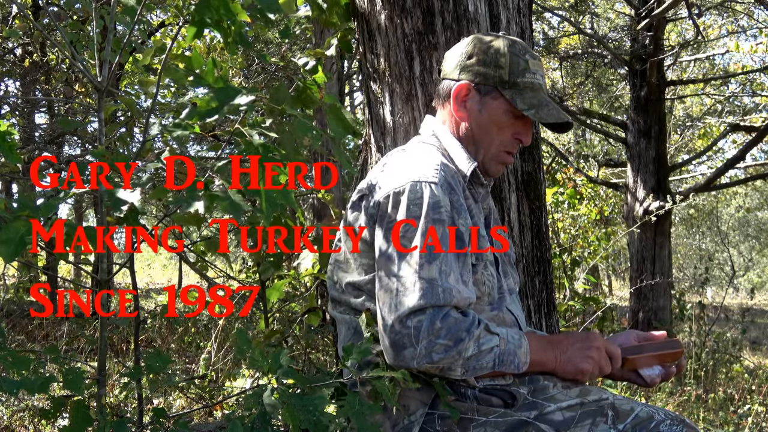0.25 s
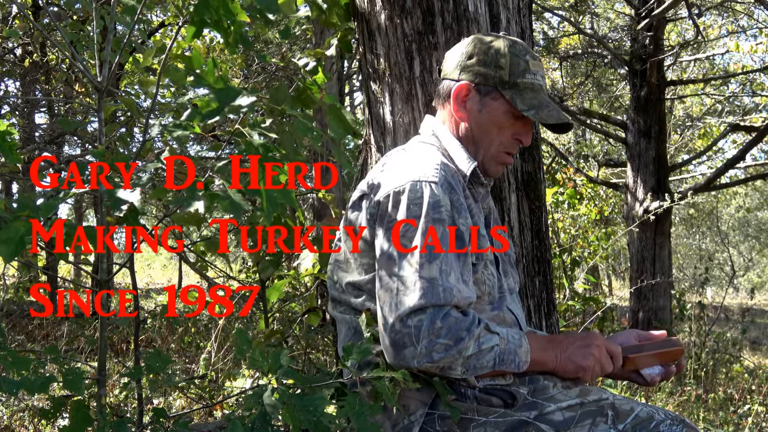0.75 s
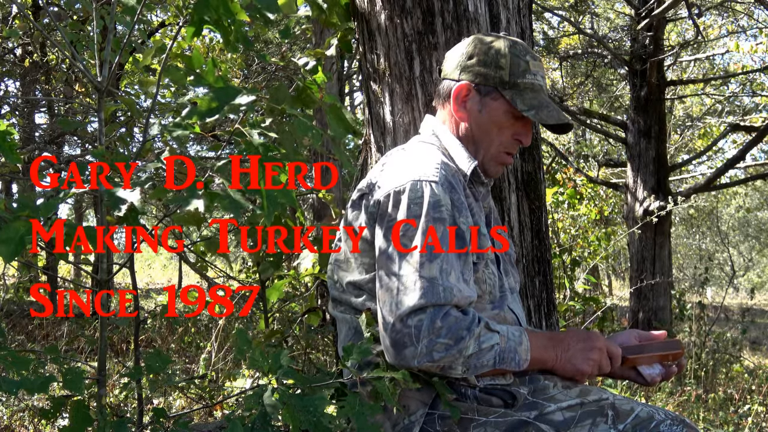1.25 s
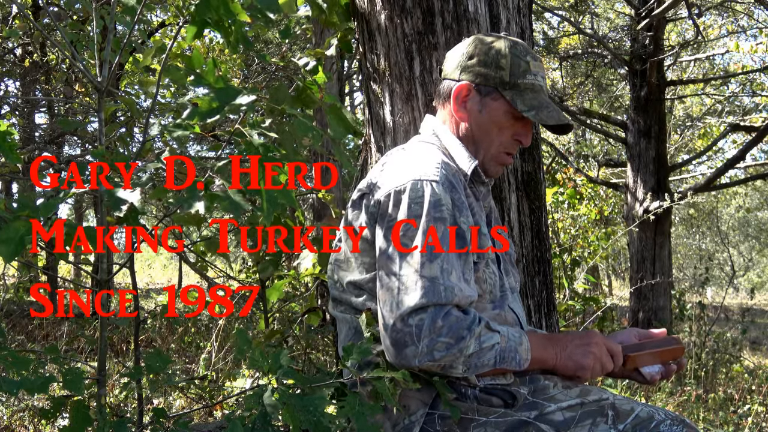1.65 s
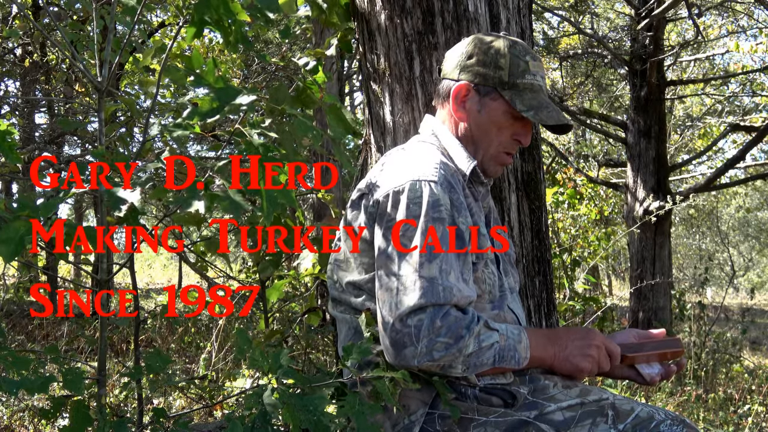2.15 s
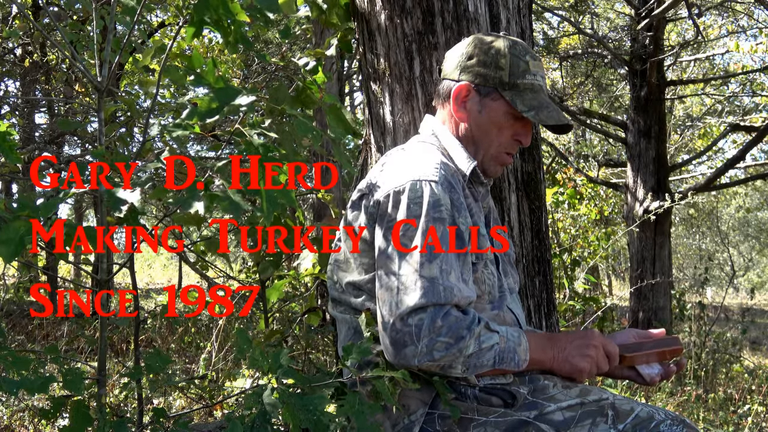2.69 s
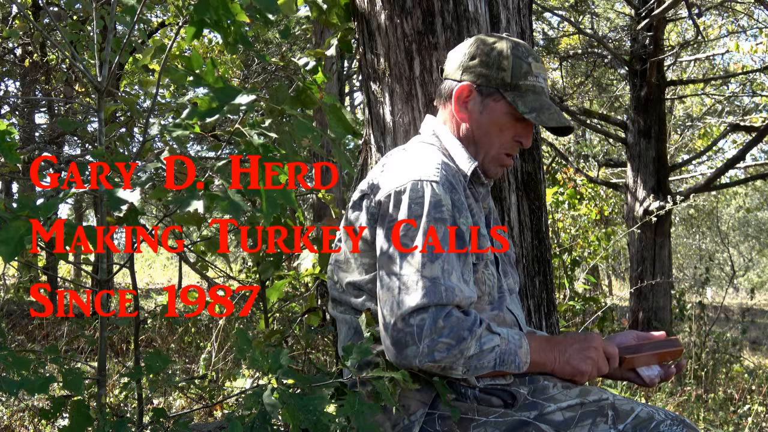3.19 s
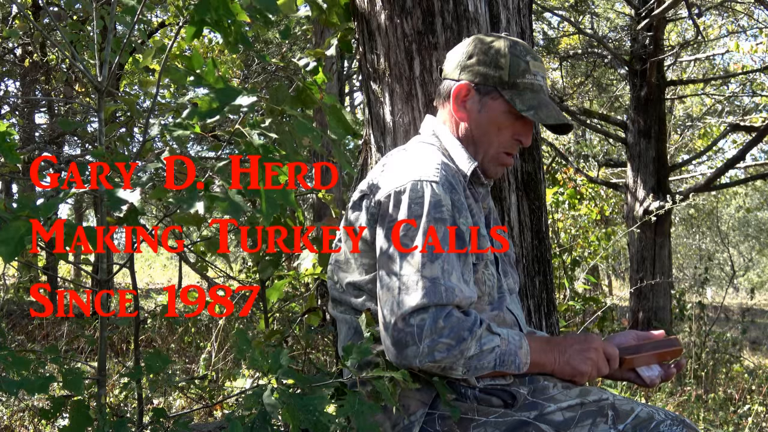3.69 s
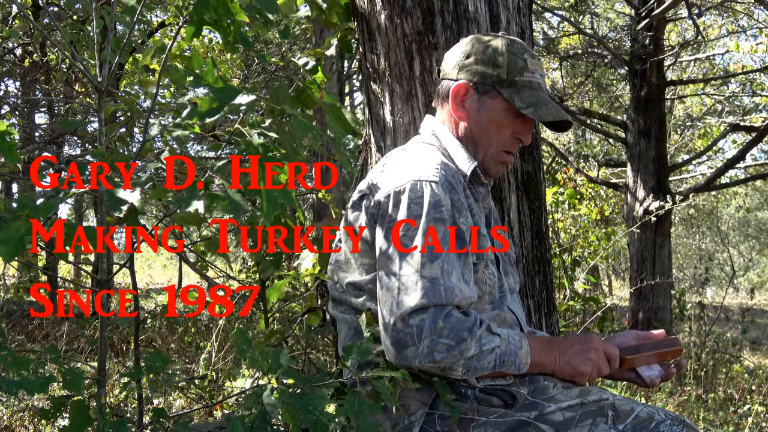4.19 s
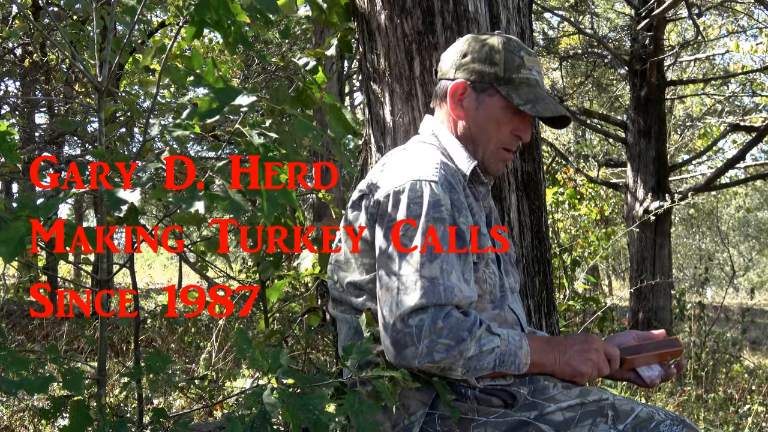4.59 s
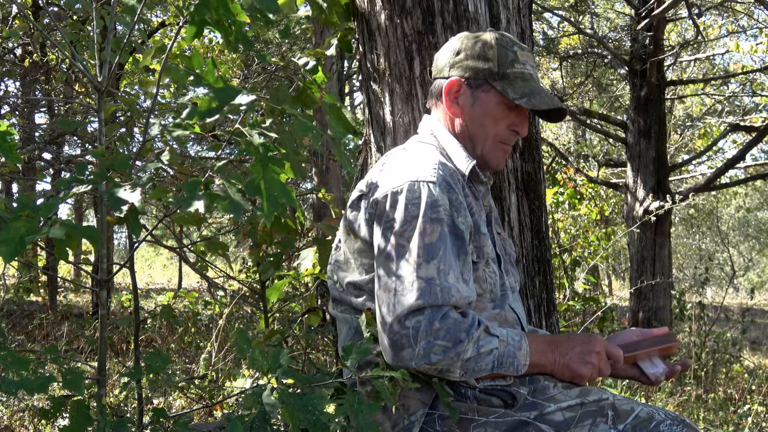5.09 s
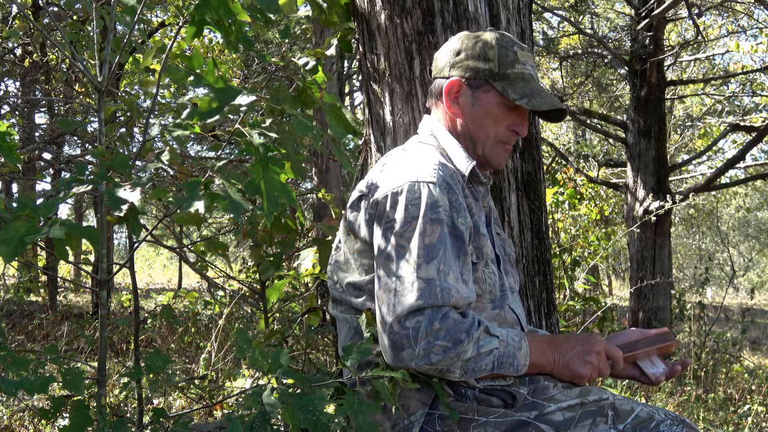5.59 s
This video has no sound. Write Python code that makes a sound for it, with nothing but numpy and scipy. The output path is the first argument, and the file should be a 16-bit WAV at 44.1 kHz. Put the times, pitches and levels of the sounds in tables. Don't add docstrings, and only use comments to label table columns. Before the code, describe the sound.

In quiet woods with soft crickets and distant traffic, an insect ticks rapidly for half a second. A wooden box call close to the microphone then makes seven loud, evenly spaced turkey-like yelps, each squealing, ringing and breaking into a rasp. After a pause comes one short cluck, then only quiet air, a far hoarse bird and tiny knocks. Trunks return a faint echo.

```python
import sys
import numpy as np
from scipy import signal
from scipy.fft import rfft, irfft, next_fast_len
from scipy.io import wavfile
from scipy.ndimage import uniform_filter1d, minimum_filter1d, map_coordinates

SR = 44100
rng = np.random.default_rng(int(sys.argv[2]) if len(sys.argv) > 2 else 0)


def invert_db(x):
    u = np.asarray(x, float) / 20
    return 10 ** u


def output_pcm(signal):
    pcm = np.clip(np.atleast_2d(signal).T, -1, 1) * 32767
    wavfile.write(sys.argv[1], SR, np.round(pcm).astype(np.int16))


N = 257981
T = np.arange(N) / SR

# lock in seconds, then squeal before it, hold, stumble and last grip in s.
YELP_TIMES = [
    (.660, .013, .053, .007, .005),
    (.996, .018, .053, .015, .016),
    (1.333, .020, 0.05, .014, .010),
    (1.629, 0.032, .027, .028, 0.017),
    (1.915, .041, .032, .014, .029),
    (2.217, .044, 0.023, 0.021, 0.028),
    (2.502, .028, 0.032, .026, .018),
]
# squeal in Hz, locked rate in Hz, sag before the break in Hz,
# last grip in Hz, level in dB.
YELP_GRIPS = [(800, 800, 12, 680, -11), (979.5, 834, 40, 540, -7), (960, 848, 55, 520, -6),
              (1034, 862, 25, 545, -8), (1024, 844, 1, 545, -6.5), (1041, 849, 1, 800, -8),
              (1012, 842, 5, 540, -7.5)]
# time in seconds, slip rate in Hz, level in dB, unevenness of the
CLUCK_STROKE = [
    (3.414, 1207, -27.5, 0, 0.1),
    (3.4192, 1190, -6, 0.08, 0.14),
    (3.422, 1150, -19, 0.15, 0.16),
    (3.424, 956, -16, 0.2, .4),
    (3.426, 870, -11, 0.08, 0),
    (3.4295, 860, -13, 0.08, 0.1),
    (3.433, 850, -26, .25, 0),
    (3.448, 820, -37, .3, 0),
]
# time in seconds, level in dB.
LID_TAPS = [(.968, -37), (1.3088, -13), (1.5927, -15), (2.166, -29), (2.4692, -17), (3.4091, -35)]
# frequency in Hz, width in Hz, level in dB, polarity with weight.
BOX_MODES = [(1018, 240, -14.5, 0.93), (1227, 130, -0.5, -1.368), (1430, 180, -16.5, 0.92),
             (1616, 170, 1, 0.85), (2400, 200, -19, 0.72), (2980, 232, -15.5, -1.375), (3303, 82, -22, 1),
             (3972, 110, -12, 1), (4500, 300, -27, 0.92), (5030, 160, -23.5, 0.87), (5570, 280, -20.5, 0.9),
             (6550, 170, -25, 1), (7860, 200, -21.5, 0.96), (8184, 430, -23.5, -1.3),
             (9300, 250, -32.5, -0.96), (10150, 250, -34.5, -1), (10970, 170, -20, -1.1),
             (11900, 760, -34.5, -1.4), (12540, 300, -33.5, 0.91), (14600, 600, -35, 1)]
# frequency in Hz, level in dB per Hz.
CHALK_COLOUR = [(500, -46), (800, -23.5), (1100, -3.5), (1500, -5.5), (3000, -5.5), (5000, 3), (8000, -7.5),
                (12000, -16), (16000, -34.5)]
# delay in seconds, level in dB.
TRUNK_ECHO = [(.004, -2.5), (.03, 0.5), (.05, -8), (.085, -8.5), (.115, -6.5), (.127, -12.5), (.16, -17),
              (.25, -19.5), (.4, -29), (.65, -29)]
# frequency in Hz, rate in dB per half second.
LEAF_LOSS = [(500, -18), (1500, -14.5), (3000, -4), (6000, -10), (12000, -53.5)]
# frequency in Hz, level in dB.
BARK_COLOUR = [(600, -4), (1300, -6.5), (1700, -1), (2400, 0), (4000, 2), (7000, 4), (14000, -4.5)]
# time in seconds, peak in dB, pitch in Hz, 60 dB decay in seconds.
KNOCKS = [
    (5.036, -45, 1440, 0.028),
    (5.2135, -42, 1390, 0.035),
    (3.5605, -38, 9500, .002),
]
# time in seconds, peak in dB.
WING_SNAPS = [(0.0154, -43), (0.0583, -44), (0.1044, -44), (0.1491, -41.5), (0.1915, -40), (0.2374, -42),
              (0.2833, -40), (0.3282, -39.5), (0.376, -38), (0.4199, -37.5), (0.4638, -33.5), (0.5072, -35),
              (0.5501, -36), (0.5931, -39)]
# time in seconds, extra path by the ground in metres.
GROUND_DETOUR = [(0, 0.06), (.33, .04), (.375, 0.083), (.42, 0.11), (.46, 0.074), (.6, .086)]
# pitch in Hz, level in dB, share of the time spent singing.
CRICKET_VOICES = [(7058, -60.5, 0.21), (7690, -62.5, .3), (6170, -61, .14)]
# chirps per second, middle of the first chirp in seconds.
CRICKET_BEATS = [(6.0, .074), (8.56, .06), (6.32, .152)]
# time in seconds, level in dB.
BUZZ_LEVEL = [(2.64, -62), (3.21, -56.5), (3.405, -54)]
# start in seconds, length in seconds, pitch in Hz, fall in Hz, level in dB.
BIRD_CALLS = [
    (2.945, .245, 3057, 200, -65),
    (5.384, .365, 2357, 280.5, -71.5),
]
# time in seconds, half length in seconds, level in dB, centre in Hz.
LEAF_SWISH = (4.11, .06, -69, 3500)
# frequency in Hz, level in dB per Hz.
AIR_COLOUR = [(20, -7.5), (70, -2.5), (170, -10.5), (330, -13.5), (480, -12), (1300, -13), (1600, -20.5),
              (5400, -23.5), (6000, -10.5), (7800, -13), (8500, -19.5), (13000, -24), (15500, -32),
              (16000, -41)]
# frequency in Hz, correlation from 0 to 1.
AIR_LIKENESS = [(60, 1), (150, 0.78), (380, 0.74), (950, 0.84), (2380, 0.99), (5980, 0.58), (15000, 0.4965)]
# frequency in Hz, width in Hz, level in dB over the noise.
ENGINE_DRONE = [(73.5, 10, 2.5), (490, 60, -4.5), (633, 27, -4), (790, 70, -2), (990, 36, -2.5),
                (1150, 45, 5), (1400, 33, -12.5)]
# time in seconds, level in dB.
TRAFFIC_LEVEL = [(0, -70.5), (1.09, -62), (2.38, -64), (3.22, -68.5), (4.38, -63.5), (5.85, -64.5)]
# time in seconds, level in dB.
BREEZE_LEVEL = [(0, -75.5), (2.38, -64), (3.22, -65.5), (3.5, -71), (4.89, -70.5), (5.85, -67)]


def unit(x):
    return x / np.sqrt(np.mean(x ** 2) + 1e-20)


def along(points, hz):
    f, v = np.transpose(points)
    return np.interp(np.log(hz + 1), np.log(f + 1), v)


def curves(rows):
    s, *cols = np.transpose(rows)
    return [np.interp(T, s, c) for c in cols] + [(T > s[0]) & (T < s[-1])]


def wobble(rate, size=N):
    coarse = np.arange(0, size + 16, 16)
    knots = rng.standard_normal(int(size * rate / SR) + 4)
    smooth = map_coordinates(knots, [coarse * rate / SR], mode="nearest")
    return np.interp(np.arange(size), coarse, smooth)


def filtered(x, response):
    m = next_fast_len(N + SR // 2)
    return irfft(rfft(x, m) * response(np.fft.rfftfreq(m, 1 / SR)), m)[..., :N]


def ring(f, hz, width_hz):
    return 1j * f * width_hz / (hz * hz - f * f + 1j * f * width_hz)


def pulses(times, sizes):
    at = np.floor(times * SR).astype(int)[:, None] + np.arange(-8, 9)
    off = at - times[:, None] * SR
    clicks = sizes[:, None] * np.sinc(off) * np.cos(off * np.pi / 18) ** 2
    return np.bincount(at.ravel(), clicks.ravel(), N)[:N]


def pan(x, left_db):
    return np.array([x * invert_db(left_db / 2), x * invert_db(-left_db / 2)])


def lid():
    slips, grit = np.zeros(N), np.zeros(N)
    strokes = [yelp(*row) for row in zip(YELP_TIMES, YELP_GRIPS)] + [CLUCK_STROKE]
    for rows in strokes:
        s, *cols = np.transpose(rows)
        t = np.arange(s[0], s[-1], 1 / SR)
        hz, db, uneven, alternate = (np.interp(t, s, c) for c in cols)
        chance = np.interp(t, s[0] + np.arange(SR // 5) / SR, wobble(420, size=SR // 5))
        stray = 1.3 * np.maximum(uneven - .035, 0) * chance + .004 * chance
        turns = np.cumsum(hz * np.exp(stray)) / SR
        count = np.arange(1, int(turns[-1]))
        at = np.searchsorted(turns, count)
        overtones = np.abs(box(hz[at, None] * np.arange(1, 13)))
        carried = np.sqrt(2 * np.sum(overtones ** 2, axis=1)) * hz[at] / SR
        slip_db = db[at] + 14 * uneven[at] * rng.standard_normal(300)[:len(at)]
        size = invert_db(slip_db) / carried * np.minimum(count / 3, 1)
        slips += pulses(np.interp(count, turns, t), size * (1 + alternate[at] * (-1.) ** count))
        roughness = .004 + .9 * np.maximum(uneven - .012, 0)
        grit[round(s[0] * SR):][:len(t)] = invert_db(db) * roughness * (1 + np.cos(2 * np.pi * turns))
    chalk = unit(filtered(rng.standard_normal(N), lambda f: invert_db(along(CHALK_COLOUR, f))))
    return filtered(slips + taps(), box) + invert_db(2.0) * grit * chalk


def yelp(timing, grip):
    lock, squeal, hold, stumble, last = timing
    squeal_hz, lock_hz, sag_hz, last_hz, db = grip
    brake, end = lock + hold, lock + hold + stumble + last
    snap_s, swell_s, fall_hz_per_s = .006, .022, 2200
    squeal_db, rise_db = -17.5, 16
    glide_s = squeal - snap_s
    snap_hz = max(squeal_hz - fall_hz_per_s * glide_s, lock_hz)
    snap_db = squeal_db - rise_db * max(1 - glide_s / swell_s, 0)
    rough, limp = 9 * stumble, np.clip(14 * stumble, .27, 1)
    worn, steady, last_rough = .14 * rough, .025, .045
    stumble_hz, stumble_db = 712, -2.5
    fade_s, fade_db, last_fall = .011, -20, .04
    return [(lock - squeal, squeal_hz, squeal_db - rise_db, steady, 0),
            (lock - snap_s, snap_hz, snap_db, steady, 0),
            (lock, lock_hz, db - 2.5, 0, 0),
            (lock + .65 * hold, lock_hz, db, worn, .1 * limp),
            (brake, lock_hz - sag_hz, db, 2 * worn, limp),
            (brake + .4 * stumble, stumble_hz, db + stumble_db, rough, limp),
            (brake + stumble, last_hz, db, last_rough, limp / 2),
            (end - min(fade_s, .8 * last), last_hz * (1 - last_fall / 2), db + 2 * stumble_db,
             last_rough, limp / 2),
            (end, last_hz * (1 - last_fall), db + fade_db, 2 * steady, 0)]


def box(f, low_hz=760, high_hz=9000):
    u, v = 1j * f / low_hz, 1j * f / high_hz
    modes = sum(sign * invert_db(db) * ring(f, hz, w) for hz, w, db, sign in BOX_MODES)
    return modes * (u * u / (1 + 0.77 * u + u * u)) ** 2 / (1 + 1.14 * v + v * v)


def taps():
    push, t = np.zeros(N), np.arange(200) / SR
    for s, db in LID_TAPS:
        grain = 1 + .6 * rng.standard_normal(len(t))
        push[round(s * SR):][:len(t)] = invert_db(db + 12 - 60 * t / .003) * grain
    return push


def trees(x):
    size = SR * 7 // 10
    t = np.arange(size) / SR
    trunks = invert_db([2.5 * wobble(120, size=size) for side in range(2)])
    shared, own = rng.standard_normal((2, size)) * [[1], [.45]]
    decay = invert_db(np.interp(t, *np.transpose(TRUNK_ECHO), left=-90))
    noise = trunks * np.array([shared + own, shared - own]) * decay
    hz, frame, z = signal.stft(noise, SR, nperseg=256)
    loss_db = along(LEAF_LOSS, hz)[:, None] * frame * 2
    tail = signal.istft(z * invert_db(loss_db + along(BARK_COLOUR, hz)[:, None]), SR, nperseg=256)[1]
    return signal.fftconvolve(x[None], tail / np.linalg.norm(tail[0]), axes=1)[:, :N]


def plocks():
    out, t = np.zeros(N), np.arange(SR // 20) / SR
    for s, db, hz, t60 in KNOCKS:
        envelope = invert_db(db + 5.0 - 60 * t / t60) * (1 - np.exp(-15 * t / t60))
        out[round(s * SR):][:len(t)] += envelope * np.sin(2 * np.pi * hz * t)
    return out


def ticker():
    out, t = np.zeros((2, N)), np.arange(130) / SR - .001
    snap = lambda u: np.exp(-(u / .00009) ** 2) * np.sin(2 * np.pi * 5300 * u)
    for s, db in WING_SNAPS:
        late = np.interp(s, *np.transpose(GROUND_DETOUR)) / 343
        pair = invert_db(db + 4) * (snap(t) - .8 * snap(t - late))
        out[:, round(s * SR):][:, :len(t)] += pan(pair, -5.5)
    return out


def crickets():
    out = np.zeros((2, N))
    for (hz, db, share), (rate, middle) in zip(CRICKET_VOICES, CRICKET_BEATS):
        beat = (T - middle) * rate + share / 2 + .04 * wobble(1.5)
        gate = uniform_filter1d(1. * (beat % 1 < share), size=400)
        unsteady_db = 1.5 * wobble(7) + 3 * wobble(60)
        level = invert_db(db + .8 * (T - 1.0) + unsteady_db)
        tone = np.sin(2 * np.pi * np.cumsum(hz + 30 * wobble(80)) / SR) * level
        out += pan(gate * tone, 2.5 * rng.standard_normal())
    return out


def buzz():
    db, on = curves(BUZZ_LEVEL)
    strokes = invert_db(15 * np.cos(2 * np.pi * np.cumsum(110 + 4 * wobble(2.7)) / SR))
    resonance = lambda f: ring(f, 9500, 860) + .4 * ring(f, 10900, 1500)
    wing = filtered(strokes * rng.standard_normal(N), resonance)
    return pan(invert_db(db) * uniform_filter1d(1. * on, size=2000) * unit(wing), 1.5)


def bird_glide(s, length, hz, fall, db):
    attack, hook = 0.089, 0.41
    return curves([(s, hz, db - 4.5),
                   (s + attack * length, hz - hook * fall, db),
                   (s + length, hz - fall, db - 4)])


def birds():
    (hz, db, on), (caw_hz, caw_db, caw_on) = [bird_glide(*call) for call in BIRD_CALLS]
    pitch = np.cumsum(hz + 8 * wobble(60)) / SR
    whistle = on * invert_db(db + 3.5 + 2.5 * wobble(30)) * np.sin(2 * np.pi * pitch)
    turn = 2 * np.pi * np.cumsum(caw_hz + 15 * wobble(60)) / SR / 3
    partials = zip((2, 3, 4), (-2, 2, 1.5))
    caw = sum(invert_db(level + 3 * wobble(20)) * np.sin(k * turn) for k, level in partials)
    return pan(whistle + caw_on * invert_db(caw_db) * caw, 0.32)


def rustle():
    s, half, db, hz = LEAF_SWISH
    swish = unit(filtered(rng.standard_normal(N), lambda f: ring(f, hz, 2500) ** 2))
    return pan(invert_db(db) * np.exp(-((T - s) / half) ** 2) * swish, 0)


def air():
    rumble_db, hiss_db = curves(TRAFFIC_LEVEL)[0], curves(BREEZE_LEVEL)[0]
    z = signal.stft(rng.standard_normal((2, N)), nperseg=512)[2]
    patches = uniform_filter1d(rng.standard_normal(z.shape[1:]), size=5, axis=0)
    patches = uniform_filter1d(patches, size=12, axis=1)
    pair = signal.istft(z * invert_db(1.3 * unit(patches)), nperseg=512)[1][:, :N]
    turn = lambda f: np.arccos(np.clip(along(AIR_LIKENESS, f), -1, 1)) / 2
    drone = lambda f: 1 + sum(invert_db(db) * np.abs(ring(f, hz, w)) ** 2 for hz, w, db in ENGINE_DRONE)
    colour = lambda f: invert_db(along(AIR_COLOUR, f)) * [np.cos(turn(f)), np.sin(turn(f))] * drone(f)
    mid, side = filtered(pair, colour)
    both = invert_db(-55) * unit(np.array([mid + side, mid - side]))
    both = both + filtered(both, lambda f: (f < 120) * np.array([[.1], [-.1]]))
    low, high = filtered(both, lambda f: f < 300), filtered(both, lambda f: f > 8200)
    rumble = low * (invert_db(rumble_db + 65.5 + 1.5 * wobble(5)) - 1)
    hiss = high * (invert_db(hiss_db + 71) - 1)
    return both + rumble + hiss


def scene():
    call = lid() + plocks()
    side = filtered(call, lambda f: invert_db(-21.5) * ring(f, 6000, 14000))
    near = pan(call, -0.98) + np.array([side, -side]) * wobble(3.6)
    woods = ticker() + crickets() + buzz() + birds() + rustle() + air()
    return near + invert_db(-18.5) * trees(call) + woods


def roll_off(x):
    return signal.sosfilt(signal.butter(12, 16420, fs=SR, output="sos"), x)


def record(dry):
    need = np.minimum(1, 0.85 / (np.abs(dry).max(axis=0) + 1e-9))
    gain = uniform_filter1d(minimum_filter1d(need, size=200), size=120)
    keep = np.exp(-1 / (.45 * SR))
    loud = signal.lfilter([1 - keep], [1, -keep], np.abs(dry).mean(axis=0))
    held = dry * gain * invert_db(-3 * np.tanh(loud / 0.057))
    thump = filtered(held ** 2, lambda f: ring(f, 140, 300) * (f > 60))
    mix = filtered(held + .05 * thump, lambda f: f < 16000)
    return roll_off(mix)


dry = scene()
out = record(dry)
output_pcm(out)
```